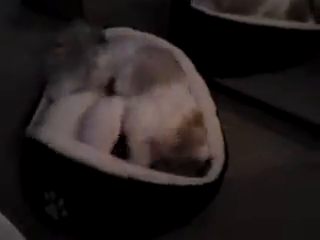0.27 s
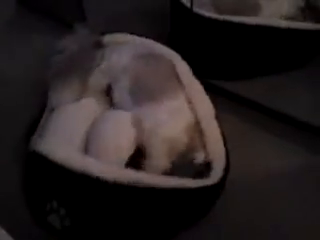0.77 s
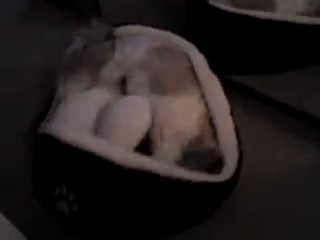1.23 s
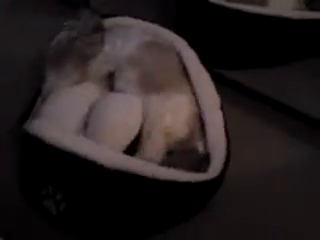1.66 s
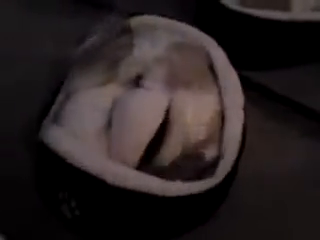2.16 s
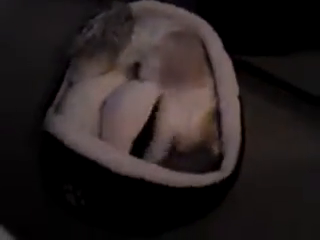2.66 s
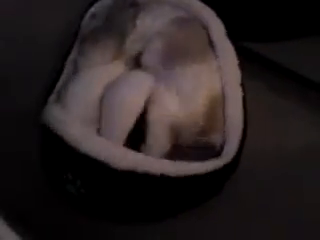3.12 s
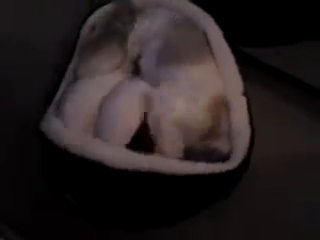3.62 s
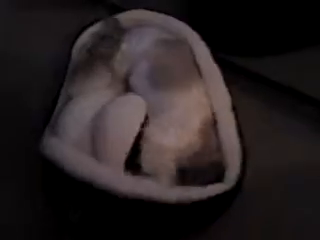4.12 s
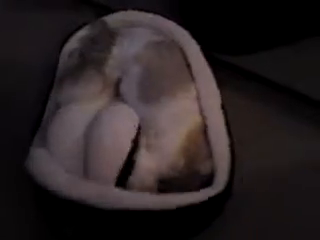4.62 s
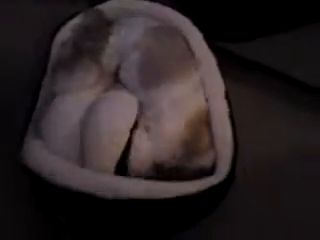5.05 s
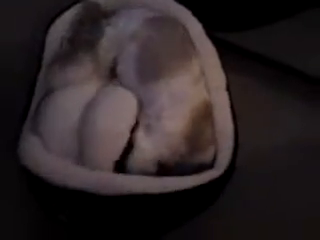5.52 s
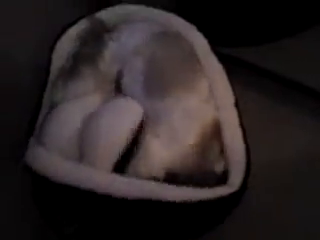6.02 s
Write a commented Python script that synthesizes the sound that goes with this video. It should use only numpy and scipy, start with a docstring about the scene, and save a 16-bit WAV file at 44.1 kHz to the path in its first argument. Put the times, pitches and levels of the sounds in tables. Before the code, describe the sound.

A small dog in a padded bed, close to the microphone in a quiet, dry furnished room with a steady soft hiss. From 0 to 1.3 seconds it makes quick strokes, each a swish, dull cushion press and fabric rub with a light brush of fur. Small knocks fall near 0.3, 0.9 and 1.1; a short sharp snort comes at 0.5, and a small snuff with a bright, loud wet click at 1.3. From 1.4 to 2.8 strokes thin out and faint airy sniffs take over, with a barely heard low bump near 2.0 and a wet click at 2.8. From 2.9 the strokes return firmer, four or five a second, continuing to the end with small mouth ticks. A woody knock lands at 3.8, a hard double tap at 4.15, a faint one at 5.3, and a last sharp knock at 6.1.

```python
"""A small dog curled in a padded bed works at its fur with quick strokes, four or five a second.
Each stroke is shaped noise: a swish, a press into the cushion with a rub, then a brush through the fur.
In the first half the dog snuffles: puffs of noise pass through throat and nose resonances.
Some strokes knock the bed, heard as short ringing tones; now and then the mouth makes a wet click.
One soft low bump is a swelling tone. Weak echoes, a short room tail and a steady hiss surround it all."""
import sys
import numpy as np
from scipy import signal
from scipy.fft import rfft, irfft, next_fast_len
from scipy.io import wavfile

SR = 44100
rng = np.random.default_rng(int(sys.argv[2]) if len(sys.argv) > 2 else 0)


def unload_audio(sound):
    """Save the sound as a 16-bit wav file, at the path given as the first command line argument."""
    columns = np.transpose(np.atleast_2d(sound))
    # keep every value between -1 and 1, then stretch to whole-number steps
    steps = np.round(np.clip(columns, -1, 1) * 32767)
    wavfile.write(sys.argv[1], SR, steps.astype(np.int16))


N = 276948
TIME = np.arange(N) / SR


def amp(db):
    """Turn decibels into a gain."""
    return 10 ** (np.asarray(db) / 20)


def unit(x):
    """Scale a sound to an rms of 1."""
    return x / np.sqrt(np.mean(x ** 2) + 1e-20)


def along(points, hz):
    """Read a curve of (frequency, value) points, with straight lines on a log frequency axis."""
    point_hz, values = np.transpose(points)
    return np.interp(np.log(hz + 1), np.log(point_hz + 1), values)


def filtered(x, response):
    """Multiply the spectrum of x by a response, given as a function of frequency."""
    size = next_fast_len(N + 8192)
    hz = np.fft.rfftfreq(size, 1 / SR)
    return irfft(rfft(x, size) * response(hz), size)[:N]


def coloured(x, spectrum):
    """Give a noise the balance of low and high tones in a spectrum, at an rms of 1."""
    return unit(filtered(x, lambda hz: amp(along(spectrum, hz))))


def grainy(rate, depth_db):
    """Make noise in clumps: its level wanders between random points, `rate` of them a second."""
    knots = rng.standard_normal(N)
    wander = np.interp(TIME * rate, np.arange(N), knots)
    return unit(rng.standard_normal(N) * amp(depth_db * wander))


def swell(s, rise, fall, shape, hold=0):
    """Draw a hump that reaches 1 at time s and may hold it; a low shape is pointed with long skirts."""
    before = np.maximum((s - TIME) / rise, 0)
    after = np.maximum((TIME - s - hold) / fall, 0)
    return np.exp(-(before + after) ** shape / 2)


def resonance(f, hz, width, lift_db):
    """Response of an air cavity that lifts one band (or lowers it, if lift_db is negative)."""
    band = 1j * f * width / (hz * hz - f * f + 1j * f * width)
    return 1 + (amp(lift_db) - 1) * band


def add(track, s, sound):
    """Mix a short sound into the track at time s."""
    part = track[round(s * SR):][:len(sound)]
    part += sound[:len(part)]


def strokes():
    """Each stroke swishes in, catches on the fabric as it presses the cushion, and brushes off through fur."""
    # every stroke: (time [s], push into the cushion [dB], rub on the fabric [dB])
    stroke_table = [(0.018, -36, -38), (.303, -33.5, -41.5), (.47, -37, -46), (.63, -41.5, -51.5),
                    (0.729, -36, -39.5), (0.938, -33.5, -37), (1.129, -37.5, -39.5), (1.26, -39.5, -42.5),
                    (1.763, -41, -58), (2.314, -42, -48), (2.676, -42.5, -44.5), (2.892, -28.5, -35.5),
                    (3.137, -31, -39.5), (3.337, -32.5, -37), (3.587, -31.5, -37.5), (3.762, -31.5, -36.5),
                    (3.997, -35, -37), (4.14, -36.5, -40), (4.2, -55, -51), (4.403, -43, -42),
                    (4.596, -36.5, -35.5), (4.826, -35.5, -39), (5.011, -36, -38), (5.271, -36, -39.5),
                    (5.43, -46, -42.5), (5.681, -35.5, -41), (5.843, -44.5, -41), (6.148, -30, -36),
                    (6.23, -45, -38)]
    # noise spectra of the four parts of a stroke: (frequency [Hz], relative level [dB per Hz])
    cushion_spectrum = [(25, -39.5), (70, -4.5), (160, -6.5), (280, 0.5), (450, -3), (600, -12), (900, -19),
                        (1600, -39), (4000, -62)]
    rub_spectrum = [(100, -8.5), (400, -23), (700, 3.5), (900, -1), (1150, 2.5), (1700, -1), (2500, -3.5),
                    (3300, -14.5), (5500, -13.5), (8500, -35.5)]
    swish_spectrum = [(60, -12.5), (300, 4), (800, -3), (1200, 2.5), (2000, -1.5), (2600, -6.5),
                      (3400, -16), (6000, -17.5), (8500, -39.5)]
    fur_spectrum = [(800, -21), (2500, 2.5), (4500, 2.5), (6200, -5.5), (8500, -20)]
    usual_push_db, usual_rub_db = -36.5, -38.5
    quicker_per_db = 0.06  # harder strokes are quicker
    swish_lead_s, swish_db = 0.068, -45.5  # the swish comes first; its level in a usual stroke
    swish_follows = 0.75  # dB of swish gained for each dB of rub
    brush_lag_s, brush_length_s, brush_db = 0.03, 0.015, -12  # brush level is relative to the rub

    push, rub, swish, brush = np.zeros((4, N))
    for s, push_db, rub_db in stroke_table:
        length = 0.026 * np.exp(-quicker_per_db * (push_db - usual_push_db))  # [s]
        contact = swell(s, 0.74 * length, 0.93 * length, shape=1.52)
        push += amp(push_db) * contact
        rub += amp(rub_db) * contact
        sweep_db = swish_db + swish_follows * (rub_db - usual_rub_db)
        swish += amp(sweep_db) * swell(s - swish_lead_s, rise=0.031, fall=0.042, shape=1.6)
        brush_hump = swell(s + brush_lag_s, brush_length_s, brush_length_s, shape=6.1)
        brush += amp(rub_db + brush_db) * brush_hump
    cushion = push * coloured(grainy(rate=220, depth_db=1.5), cushion_spectrum)
    fabric = rub * coloured(grainy(rate=300, depth_db=2.06), rub_spectrum)
    sweep = swish * coloured(grainy(rate=250, depth_db=6.5), swish_spectrum)
    fur = brush * coloured(grainy(rate=700, depth_db=3.5), fur_spectrum)
    return cushion + fabric + sweep + fur


def snuffles():
    """Puffs of turbulent air flutter through the throat and moist nose, each with its own nasal resonance."""
    # every puff: (time it reaches full strength [s], rise [s], hold [s], fall [s], level [dB],
    # nasal resonance [Hz], width of that resonance [Hz], its lift [dB], throat lift [dB])
    snuffle_table = [(0.492, 0.0042, .005, .01, -18, 1280, 150, 21, 2.5),
                     (0.517, 0.014, 0.0086, 0.02, -25, 1340, 1290, 11, 0),
                     (1.3, 0.014, 0.016, 0.017, -26, 3050, 2010, 5.5, -5.5),
                     (1.422, 0.034, 0.23, 0.013, -44, 2100, 1300, 11, -12),
                     (1.78, 0.041, 0.11, 0.037, -46, 2550, 490, 15, 7),
                     (2.117, 0.036, 0.063, 0.069, -35, 2880, 1500, 4, 8),
                     (2.221, .007, .005, 0.033, -35.5, 3450, 600, 18, 3),
                     (2.419, 0.0032, 0.046, .032, -34, 2720, 1500, 11.5, 4),
                     (2.73, 0.037, 0.14, 0.068, -40.5, 1500, 710, 19, 6)]
    # noise of the rushing air: (frequency [Hz], relative level [dB per Hz])
    nose_spectrum = [(50, -1), (200, 0), (420, 5), (900, 2.5), (1100, 1), (2000, 2.5), (2400, 1),
                     (3400, -0.5), (4100, -1), (5400, 1), (6400, -4), (7700, -11), (8800, -27)]
    throat_hz, throat_width_hz = 645, 190

    out = np.zeros(N)
    air = coloured(grainy(rate=450, depth_db=2.5), nose_spectrum)
    for s, rise, hold, fall, db, hz, width, lift_db, throat_db in snuffle_table:
        def airway(f):
            """Nose and throat in a row."""
            return resonance(f, hz, width, lift_db) * resonance(f, throat_hz, throat_width_hz, throat_db)

        # a random shift gives each puff a different stretch of air
        breath = unit(filtered(np.roll(air, rng.integers(N)), airway))
        out += amp(db) * swell(s, rise, fall, shape=1.21, hold=hold) * breath
    return out


def knocks():
    """The bed rings in fading tones after each knock and its cover scuffs; soft contacts dull the sound."""
    # every knock: (time [s], level [dB], softness as contact time [s], pitch of the spot struck [ratio])
    knock_table = [(0.29, -21, 0.00049, 1.94), (.324, -17.5, 0.002, 0.7), (0.928, -14, 0.0021, 1.63),
                   (1.12, -21, 0.0028, 1.57), (3.768, -5.5, 0.0034, 1.17), (4.073, -17.5, 0.00063, 1.15),
                   (4.1505, -3, 0.00056, 0.99), (4.167, -8, .0009, 1.016), (5.283, -21.5, 0.0011, 1.15),
                   (6.1157, -14.5, 0.0002, 1.47), (6.1252, -3.5, .0011, 1.19)]
    # ringing tones of the bed: (frequency [Hz], level [dB], time to fade by 60 dB [s])
    bed_modes = [(101, -26, 0.13), (207, -51, 0.041), (258.7, -8, 0.052), (633, -1.5, 0.014),
                 (765, -14, 0.036), (1230, -10.5, 0.0077), (1800, -6.5, .01)]
    scuff_db, scuff_t60 = -21, 0.026  # t60: seconds to fade by 60 dB

    out = np.zeros(N)
    t = np.arange(SR // 5) / SR
    for s, db, softness, pitch in knock_table:
        ring = np.zeros(len(t))
        for hz, level, t60 in bed_modes:
            fade = amp(level + rng.normal() - 60 * t / t60)  # each tone's level varies a little
            ring += fade * np.sin(2 * np.pi * hz * pitch * t)
        scuff = rng.standard_normal(len(t)) * amp(scuff_db - 60 * t / scuff_t60)
        # smoothing by the press of the contact takes off the upper tones
        press = np.sin(np.pi * np.minimum(t / softness, 1))[:SR // 100]
        add(out, s, amp(db) * np.convolve(ring + scuff, press / press.sum()))
    # a small bed radiates almost no deep bass
    return signal.sosfilt(signal.butter(3, 100, "high", fs=SR, output="sos"), out)


def bump():
    """A soft low tone swells and fades as the dog's weight shifts."""
    s, hz, db = 1.966, 133, -37.0
    tone = np.sqrt(2) * np.sin(2 * np.pi * hz * TIME)  # rms 1
    return amp(db) * swell(s, rise=0.019, fall=0.014, shape=1.8) * tone


def clicks():
    """Wet surfaces part in a few ticks, each a crack that rings the mouth; low clicks have dull cracks."""
    # every mouth click: (time [s], level [dB], pitch [Hz], time for the ring to fade by 60 dB [s])
    click_table = [(1.3341, -4, 2930, 0.0087), (2.8026, -16.5, 1560, 0.0084), (3.331, -20.5, 1090, 0.018),
                   (4.0729, -19.5, 3240, 0.0021), (4.1492, -12.5, 3660, 0.0012),
                   (4.569, -28.5, 1080, 0.017), (5.01, -19, 1030, 0.0084), (5.743, -31.5, 2460, 0.013),
                   (5.8, -29, 1880, 0.013)]
    # the ticks in which every click parts: (delay [s], level [dB], pitch [ratio])
    tick_table = [(0, 0, 0.978), (.0017, -4, 1.115), (.0035, -12, .8), (.006, -14, 0.76)]
    # ringing tones of the mouth: (frequency relative to the tick's pitch [ratio], level [dB])
    mouth_modes = [(0.993, 0), (1.44, -6), (2, -14), (0.34, -14)]
    crack_db, crack_t60 = -5, 0.007  # t60: seconds to fade by 60 dB
    wet_top_hz = 6760  # soft tissue takes the top off every click

    out = np.zeros(N)
    t = np.arange(SR // 20) / SR
    for s, db, hz, t60 in click_table:
        dull = signal.butter(3, hz, fs=SR, output="sos")
        for delay, tick_db, pitch in tick_table:
            tones = sum(amp(level) * np.sin(2 * np.pi * hz * pitch * ratio * t)
                        for ratio, level in mouth_modes)
            ring = tones * amp(-60 * t / t60)
            crack = rng.standard_normal(len(t)) * amp(crack_db - 60 * t / crack_t60)
            add(out, s + delay, amp(db + tick_db) * (ring + signal.sosfilt(dull, crack)))
    return signal.sosfilt(signal.butter(5, wet_top_hz, fs=SR, output="sos"), out)


def nearby_echoes(x):
    """Weak echoes off the floor and furniture ripple the spectrum."""
    count, shortest_s, longest_s, echo_db = 8, 0.0028, 0.025, -19
    echoes = np.zeros(N)
    for delay in rng.uniform(shortest_s, longest_s, count):
        sign = rng.choice([-1, 1])
        echoes += sign * np.pad(x, (round(delay * SR), 0))[:N]
    return amp(echo_db) * echoes


def room(x):
    """The furnished room answers with a short tail of noise that fades at its own rate in each band."""
    # how fast the room falls silent: (frequency [Hz], time to fade by 60 dB [s])
    walls = [(150, 0.13), (1500, 0.055), (8000, 0.06)]
    hz, t, bands = signal.stft(rng.standard_normal(SR // 2), SR, nperseg=256)
    fade = amp(-60 * t / along(walls, hz)[:, None])
    tail = signal.istft(bands * fade, SR, nperseg=256)[1]
    tail = tail / np.linalg.norm(tail)
    delayed_tail = np.pad(tail, (SR // 200, 0))  # it starts 5 ms late
    return signal.fftconvolve(x, delayed_tail)[:N]


def background():
    """The quiet room hisses steadily: plain noise with a fixed spectrum."""
    # (frequency [Hz], relative level [dB per Hz])
    hiss_spectrum = [(15, -33.5), (25, -2.5), (123, 3.5), (192, 0), (298, 1.5), (944, -3.5), (1180, -3),
                     (1740, -3), (3220, -11.5), (5800, -15), (7600, -18.5), (8800, -37), (11400, -86),
                     (19400, -120)]
    hiss_db = -46
    return amp(hiss_db) * coloured(rng.standard_normal(N), hiss_spectrum)


def scene():
    """Put the dog close by, in its room."""
    rustle = strokes() + snuffles()
    dog = rustle + nearby_echoes(rustle) + knocks() + bump() + clicks()
    room_db = -16.5
    return (dog + amp(room_db) * room(dog) + background())[None]


def record(dry):
    """A very steep filter removes nearly everything above the recorder's band limit."""
    top_hz = 8600
    return filtered(dry[0], lambda hz: 1 / np.sqrt(1 + (hz / top_hz) ** 120))[None]


dry = scene()
out = record(dry)
unload_audio(out)
```